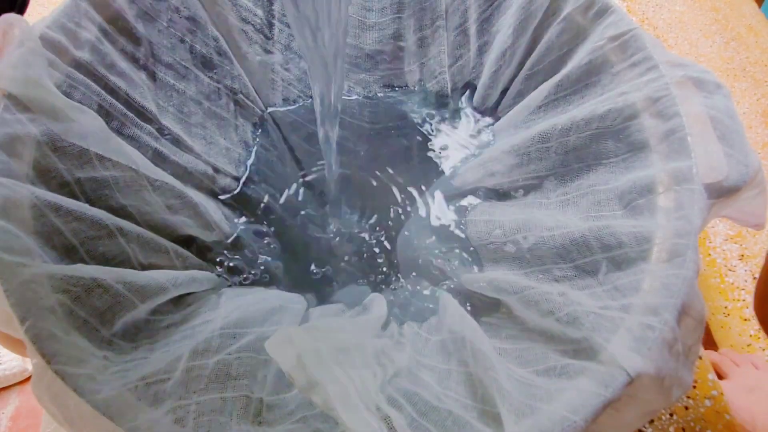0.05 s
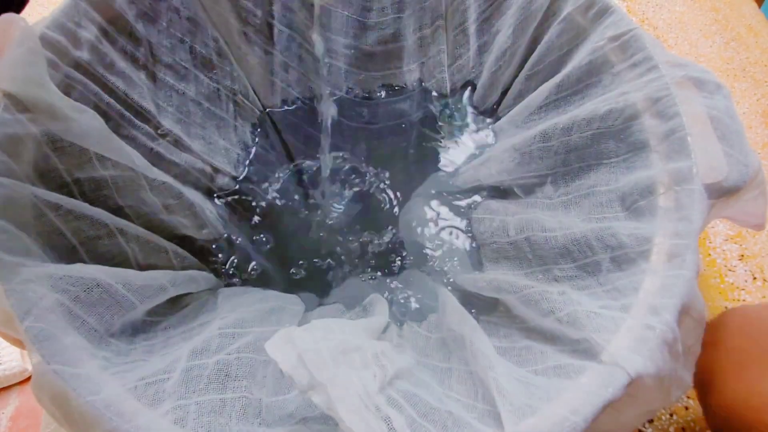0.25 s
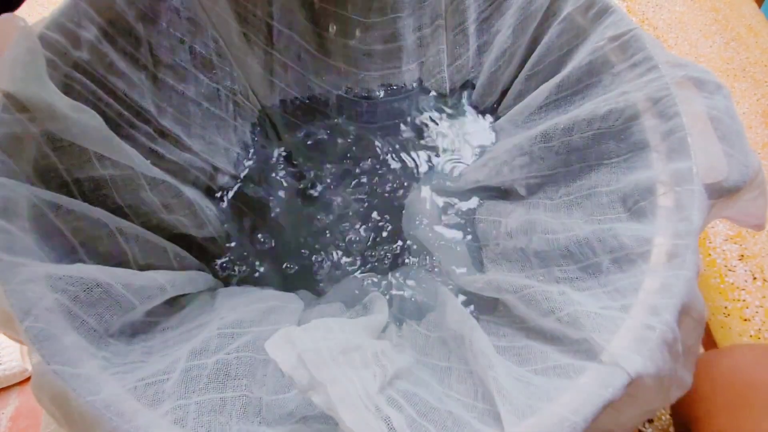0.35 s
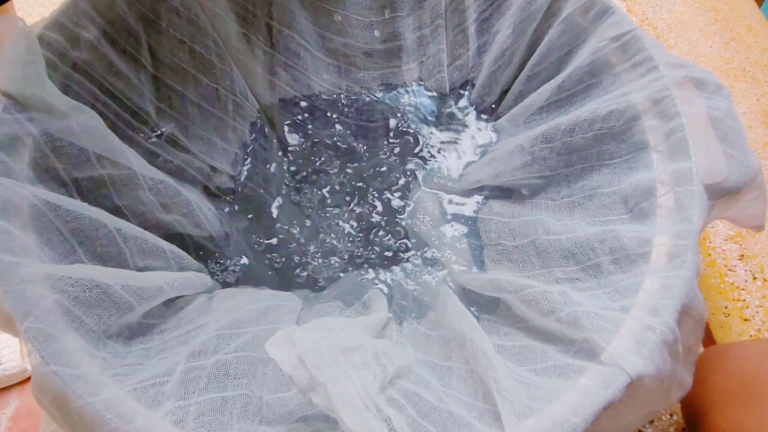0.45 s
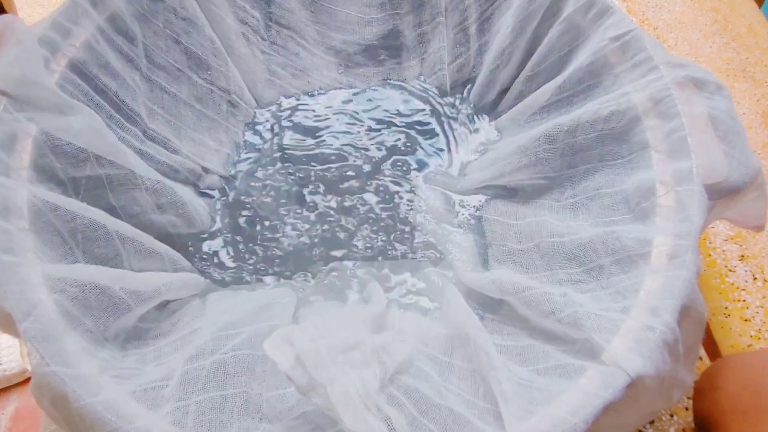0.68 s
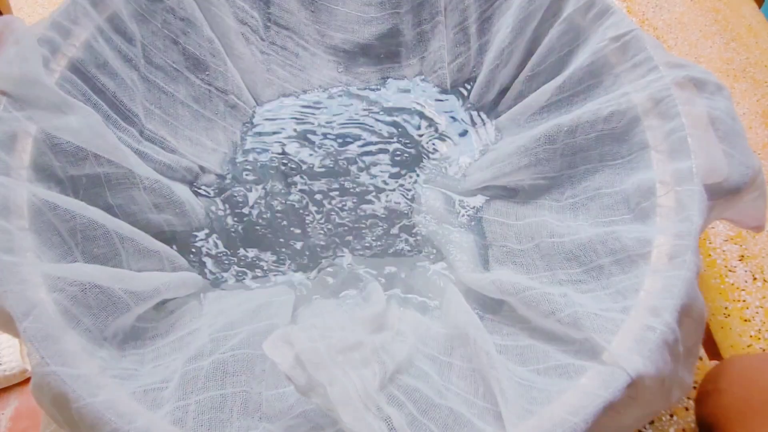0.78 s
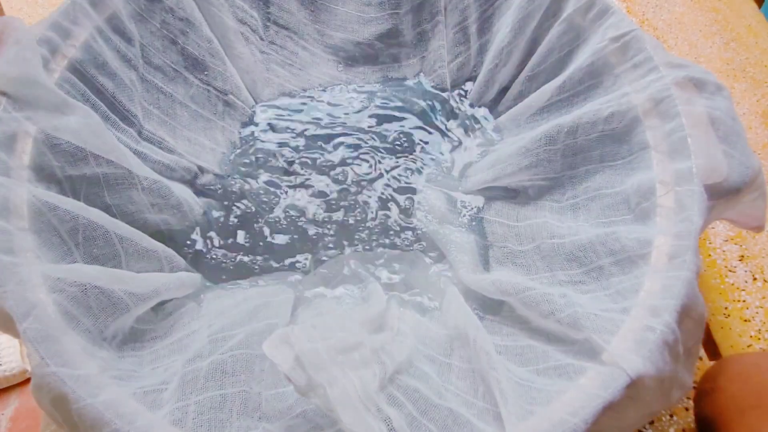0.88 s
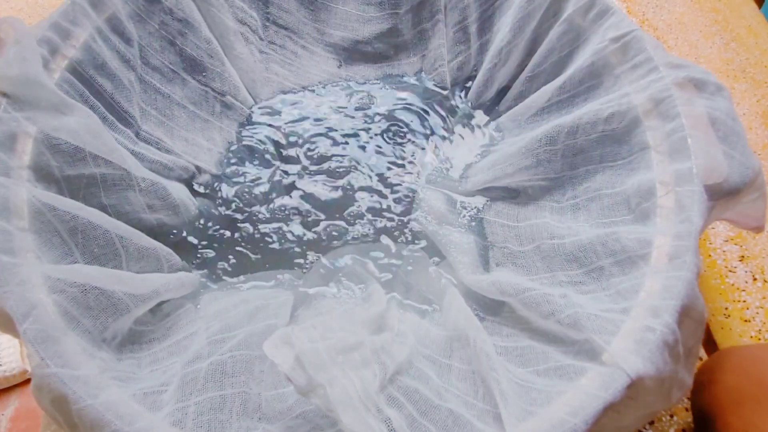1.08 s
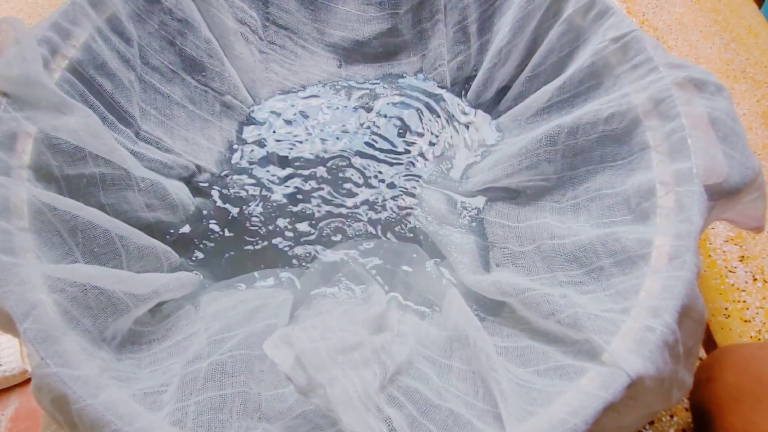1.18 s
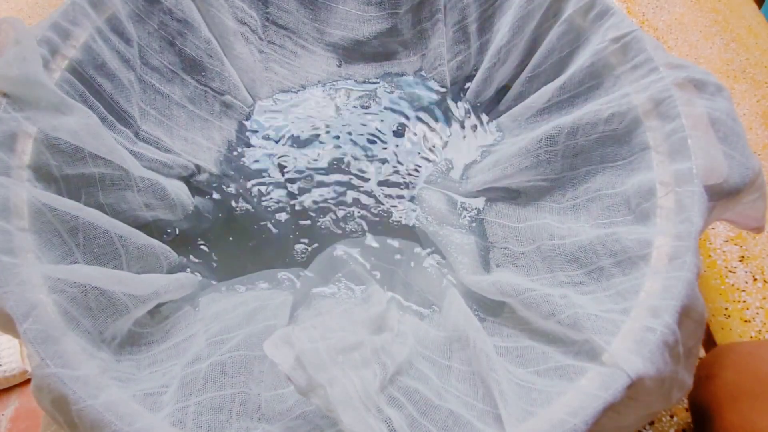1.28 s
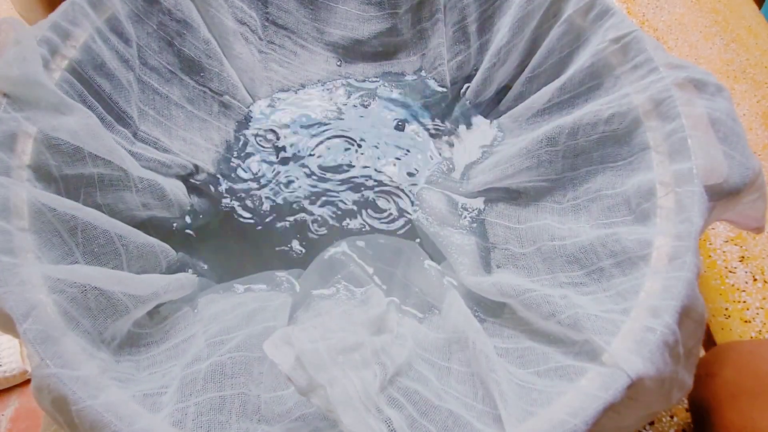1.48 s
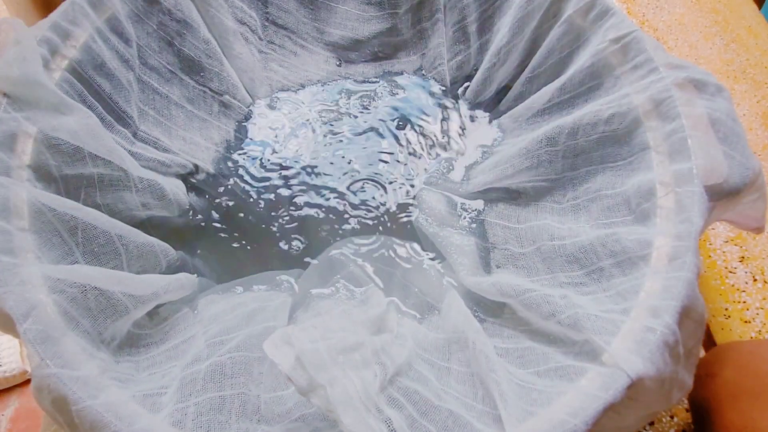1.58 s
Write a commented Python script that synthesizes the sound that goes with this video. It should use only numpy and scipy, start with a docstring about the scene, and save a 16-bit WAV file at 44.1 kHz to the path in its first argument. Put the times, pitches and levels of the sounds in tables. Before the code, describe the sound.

A thin stream of water splashes and bubbles into a cloth-lined tub, close by, its gurgle deepening. Around 0.4 seconds it runs out in a few deep bloops, with the last drops by 0.7. Froth fizzes faintly over a quiet background. Slightly to the right, a light knock comes at 1.1 seconds; a soft scuff follows, then sharp, loud plastic clicks at 1.3 and a weaker one at 1.4.

```python
"""A thin stream splashes into a pool in a cloth-lined tub, beating in bubbles and throwing spray.
It runs out; the last slugs open deep pockets of air that bloop and shake the tub.
Froth fizzes on the pool. Then come a knock and a few sharp clicks, probably from the emptied
plastic bucket, with a soft scuff between them, probably from a sandal."""
import sys
import numpy as np
from scipy import signal
from scipy.fft import rfft, irfft
from scipy.io import wavfile

SR = 44100
rng = np.random.default_rng(int(sys.argv[2]) if len(sys.argv) > 2 else 0)


def store_wav(level_fs):
    """Save 16-bit WAV to argv[1]."""
    pcm = np.round(np.clip(np.atleast_2d(level_fs), -1, 1) * 32767)
    wavfile.write(sys.argv[1], SR, pcm.T.astype(np.int16))


N = 72765
T = np.arange(N) / SR


def amp(db):
    """Decibels to gain."""
    return 10 ** (np.asarray(db) / 20)


def unit(x):
    """Scale to rms 1."""
    return x / np.sqrt(np.mean(x ** 2) + 1e-20)


def curve(points):
    """Breakpoints to one value per sample."""
    return np.interp(T, *np.transpose(points))


def at_hz(points, hz):
    """Interpolate on a log-frequency axis."""
    freq_hz, value = np.transpose(points)
    return np.interp(np.log(hz + 1), np.log(freq_hz + 1), value)


def add(mix, start_s, sound):
    """Mix a sound in at start_s."""
    part = mix[max(round(start_s * SR), 0):][:len(sound)]
    part += sound[:len(part)]


def colour(x, spectrum, tilt_db_per_oct=0, size=2048):
    """Minimum-phase filter, unit power gain; tilt acts above 2.5 kHz."""
    hz = abs(np.fft.fftfreq(size, 1 / SR))
    octaves = np.log2(np.maximum(hz, 2500) / 2500)
    log_gain = np.log(amp(at_hz(spectrum, hz) + tilt_db_per_oct * octaves))
    taps = np.fft.ifft(np.exp(np.conj(signal.hilbert(log_gain)))).real
    return signal.fftconvolve(x, taps / np.linalg.norm(taps))[:len(x)]


def resonate(x, hz, width_hz):
    """Resonance at a steady or moving pitch, rms 1."""
    carrier = np.exp(2j * np.pi * np.cumsum(hz * np.ones(N)) / SR)
    pole = np.exp(-np.pi * width_hz / SR)
    baseband = signal.lfilter([1], np.poly([pole, pole]), x / carrier)
    return unit((baseband * carrier).real)


def ticks(per_s, spread_db):
    """Random impulses of uneven size, rms 1."""
    impulses = (rng.random(N) < per_s / SR) * rng.choice([-1, 1], N)
    return unit(impulses * amp(spread_db * np.minimum(rng.exponential(1, N), 3.5)))


def impacts(rows, spectrum, snap, grain_db, size=4096):
    """Each impact: a snap, then a fast-dying crackle."""
    out, t = np.zeros(N), np.arange(size) / SR
    for start_s, level_db, decay_s, tilt_db_per_oct in rows:
        envelope = np.exp(-t / decay_s)
        crackle = rng.standard_normal(size) * amp(grain_db * np.minimum(rng.exponential(1, size), 4))
        hit = unit(crackle) * envelope
        hit[0] += snap
        hit = unit(colour(hit, spectrum, tilt_db_per_oct))
        add(out, start_s, amp(level_db) * hit * np.sqrt(np.mean(envelope ** 2)))
    return out


def bubble(hz, decay_s, attack_s, rise_per_s=1.6):
    """An air pocket rings, rising in pitch as it nears the surface."""
    t = np.arange(0, decay_s * 7, 1 / SR)
    envelope = (1 - np.exp(-(t / attack_s) ** 2)) * np.exp(-t / decay_s)
    return envelope / envelope.max() * np.sin(2 * np.pi * hz * (t + rise_per_s * t ** 2 / 2))


def bubble_cloud(low_hz, high_hz, decay_1khz_s, spread_db, count):
    """Many small bubbles; smaller ones die sooner. Rms 1."""
    out = np.zeros(N)
    for when, pitch, weakness, sustain in rng.random((count, 4)):
        hz = low_hz * (high_hz / low_hz) ** pitch
        decay_s = decay_1khz_s * (.5 + sustain) * np.sqrt(1000 / hz)
        gain = amp(-spread_db * weakness) * np.sqrt(hz)
        add(out, when * N / SR, gain * bubble(hz, decay_s, attack_s=decay_s / 6))
    return unit(out)


# Diffuse field, left to right: freq_hz, correlation
COHERENCE = [(50, 0.81), (150, 0.94), (300, 0.73), (650, 0.56), (1400, -0.52), (3000, 0.48), (16000, 0.03)]

def diffuse(pair):
    """Correlate two independent channels, most in the bass."""
    left, other = rfft(pair)
    hz = np.fft.rfftfreq(pair.shape[1], 1 / SR)
    correlation = np.clip(at_hz(COHERENCE, hz), -1, 1)
    right = correlation * left + np.sqrt(1 - correlation ** 2) * other
    return irfft([left, right], pair.shape[1])


# Room decay: freq_hz, t60_s
ROOM_DECAY = [(100, 0.4), (500, 0.4), (2500, 0.22), (8000, 0.16), (16000, 0.07)]

def place(x, lag_ms, pan_db, early_db, room_db, early_s=0.0027, size=24000):
    """Direct sound, early reflections, room tail. Positive lag and pan lean left."""
    t = np.arange(size) / SR
    hz, frame_s, noise = signal.stft(rng.standard_normal((2, size)), SR, nperseg=256)
    decay = amp(-60 * frame_s / at_hz(ROOM_DECAY, hz)[:, None])
    tail = signal.istft(noise * decay, SR, nperseg=256)[1][:, :size] * np.minimum(t / 0.0048, 1)
    early = rng.standard_normal((2, size)) * t * np.exp(-t / early_s * 2)
    response = diffuse(amp(room_db) * unit(tail) + amp(early_db) * unit(early)) / np.sqrt(size)
    khz = np.fft.rfftfreq(2 * N, 1000 / SR)
    delayed = irfft(rfft(x, 2 * N) * np.exp(-2j * np.pi * khz * lag_ms))[:N]
    direct = np.array([x * amp(pan_db / 2), delayed * amp(-pan_db / 2)])
    return direct + signal.fftconvolve(x[None], response, axes=1)[:, :N]


# Ambient noise: freq_hz, gain_db
AIR_SPECTRUM = [(20, -9.5), (60, -11), (130, -6), (200, -5), (300, -9), (450, -19.5), (550, -13),
                (800, -18.5), (2200, -30), (3500, -35), (5800, -24.5), (7200, -37.5), (16000, -19)]
# Ambient noise, rumble, whistle: time_s, level_db
AIR_LEVEL = [(0, -51.5), (.7, -59.5), (.82, -58), (.97, -56), (1.06, -56.5), (1.22, -55), (1.42, -54),
             (1.55, -62), (1.62, -61.5), (1.65, -64)]
RUMBLE_LEVEL = [(0, -61.5), (.2, -65), (.27, -96), (.42, -59), (.56, -49.5), (.66, -54), (.76, -82),
                (1.05, -82), (1.2, -56.5), (1.3, -75), (1.41, -53.5), (1.5, -83), (1.65, -83)]
WHISTLE_LEVEL = [(0, -88), (.7, -96), (.88, -70), (1.06, -71.5), (1.15, -98)]

def background():
    """Low ambient noise, a wavering rumble, a faint thin whistle."""
    air = np.array([colour(noise, AIR_SPECTRUM) for noise in rng.standard_normal((2, N))])
    rumble = np.array([resonate(noise, hz=70.5, width_hz=19) for noise in rng.standard_normal((2, N))])
    whistle = np.array([resonate(noise, hz=6130, width_hz=43) for noise in rng.standard_normal((2, N))])
    return (unit(diffuse(air)) * amp(curve(AIR_LEVEL))
            + diffuse(rumble) * amp(curve(RUMBLE_LEVEL))
            + whistle * amp(curve(WHISTLE_LEVEL)))


# Fizz: freq_hz, gain_db
FIZZ_SPECTRUM = [(500, -17), (3000, -7.5), (5000, -1), (6100, -0.5), (7000, 3), (10000, -2.5), (16000, -1)]
# Fizz: time_s, level_db
FIZZ_LEVEL = [(0, -71), (.5, -68), (.7, -61.5), (1.0, -68), (1.3, -58.5), (1.65, -78.5)]

def fizz():
    """Froth on the pool fizzes in fine, bright ticks."""
    return amp(curve(FIZZ_LEVEL)) * colour(ticks(per_s=470, spread_db=5.1), FIZZ_SPECTRUM)


# Sliding grit: freq_hz, gain_db
SCUFF_SPECTRUM = [(100, -48), (200, -0.5), (330, -22.5), (570, 0), (680, -7), (790, -2.5), (950, -8.5),
                  (1190, 2), (1550, -5), (2330, -12.5), (3400, -14.5), (4300, -21.5), (4950, -15.5),
                  (5900, -29), (15000, -32)]

def scuff(start_s=1.0765, peak_s=1.1955, rise_db_per_s=178, fall_db_per_s=143):
    """A soft gritty slide, probably a sandal, swells and fades after the knock."""
    level_db = -42.5 - np.maximum((peak_s - T) * rise_db_per_s, (T - peak_s) * fall_db_per_s)
    fade_in = np.clip((T - start_s) / 0.017, 0, 1)
    grit = np.array([colour(ticks(per_s=5000, spread_db=3.8), SCUFF_SPECTRUM) for _ in range(2)])
    return diffuse(grit) * amp(level_db) * fade_in


# Knock with rattle, clicks: start_s, level_db, decay_s, tilt_db_per_oct
KNOCK_HITS = [(1.0765, -43, 0.0032, 11), (1.0885, -51, 0.0027, -1), (1.0932, -30, 0.0034, 4.5),
              (1.0958, -23, 0.0014, -2.5), (1.098, -34.5, 0.0028, -8.5), (1.102, -33, 0.0015, 5)]
CLICK_HITS = [(1.327, -7.5, 0.0007, 1.5), (1.3292, -41, 0.00084, 15), (1.3345, -26.5, 0.0045, 1.5),
              (1.3462, -5, 0.0017, 12.5), (1.3487, -14.5, 0.0012, 1), (1.4225, -20.5, 0.0021, 11.5),
              (1.4243, -28.5, 0.00053, 8), (1.434, -40, 0.00084, 23)]
# Knock, clicks: freq_hz, gain_db
KNOCK_SPECTRUM = [(100, -32), (350, -18.5), (900, -13), (1600, -25), (2400, -7), (3100, -0.5), (3500, -2.5),
                  (4000, -4), (4550, 2), (6300, -4.5), (7300, -11), (8300, -7.5), (9600, -8), (11000, -15),
                  (12800, -12), (16000, -17.5)]
CLICK_SPECTRUM = [(100, -34), (800, -13.5), (1800, -12.5), (2400, -12), (2820, 5), (3150, -7), (3450, 2),
                  (3850, -12), (4400, -3.5), (5100, 2), (5600, -5.5), (6200, -9), (7000, -11.5),
                  (8600, 3.5), (10200, 1.5), (10900, 2.5), (12000, 2.5), (14000, -2), (15500, -1.5)]

def bucket(lag_ms=-0.328):
    """A dull knock, then sharp plastic clicks, from the right."""
    knock = impacts(KNOCK_HITS, KNOCK_SPECTRUM, snap=4.4, grain_db=2)
    knock = place(knock, lag_ms, pan_db=-2.1, early_db=-10, room_db=-10.5)
    clicks = impacts(CLICK_HITS, CLICK_SPECTRUM, snap=4.7, grain_db=2)
    return knock + place(clicks, lag_ms, pan_db=-2.4, early_db=-10, room_db=-9)


POOL_LAG_MS = 0.098
# Churned air: time_s, gain_db
CHURN_GAIN = [(0, -63.5), (.1, -62), (.16, -44), (.25, -54), (.31, -45), (.39, -44), (.43, -68),
              (.5, -77.5)]
# Moving resonance of the hollow: time_s, pitch_hz
CHURN_PITCH = [(0, 440), (.2, 385), (.28, 313), (.42, 287)]
# Steady resonances of the hollow: pitch_hz, width_hz, gain_db
HOLLOW_MODES = [(561, 120, -6), (838, 30, -12), (1358, 81, -8.5)]

def churn():
    """The hollow under the stream gurgles, deeper as the stream breaks up."""
    gurgle = resonate(ticks(per_s=300, spread_db=2.7), curve(CHURN_PITCH), width_hz=120)
    for pitch_hz, width_hz, gain_db in HOLLOW_MODES:
        gurgle += amp(gain_db) * resonate(ticks(per_s=900, spread_db=1), pitch_hz, width_hz)
    return place(gurgle * amp(curve(CHURN_GAIN)), POOL_LAG_MS, pan_db=-1, early_db=-11.5, room_db=-15)


# Tub modes: pitch_hz, gain_db, t60_s
TUB_MODES = [(64.5, -24, 0.5), (136.4, -20, 0.15), (183, -17, 0.22), (239.5, -27, .17), (272, -24, 0.13),
             (345.7, -18, 0.18), (571, -30, 0.13), (639, -19.5, 0.046)]
# Plunging slugs: start_s, pitch_hz, level_db, decay_s, tub_gain_db
SLUGS = [(.439, 260.6, -11.5, 0.0046, -13.5), (0.4494, 252, -21.5, 0.0029, -30),
         (0.4904, 264, -17, 0.003, -15.5), (0.527, 278, -27.5, 0.0038, -22), (0.596, 204, -50, 0.0093, -54),
         (.644, 231, -32.5, 0.0029, -36), (0.661, 227, -44, 0.003, -34.5)]

def bloops():
    """Each slug of water opens a deep air pocket and shakes the tub."""
    out, t = np.zeros(N), np.arange(SR // 2) / SR
    tub = sum(amp(db - 60 * t / t60_s) * np.sin(2 * np.pi * hz * t) for hz, db, t60_s in TUB_MODES)
    for start_s, pitch_hz, level_db, decay_s, tub_gain_db in SLUGS:
        add(out, start_s, amp(level_db) * bubble(pitch_hz, decay_s, attack_s=.0012))
        add(out, start_s, amp(tub_gain_db) * tub)
    out = signal.sosfilt(signal.butter(3, 55, "high", fs=SR, output="sos"), out)
    return place(out, lag_ms=0.14, pan_db=-3, early_db=-16, room_db=-17)


# Drops and slaps: freq_hz, gain_db
SPRAY_SPECTRUM = [(200, -10), (1500, -10), (3200, -1), (4300, -1), (5700, 5.5), (6700, -1), (8000, 3.5),
                  (9200, -5), (12500, -4), (16000, 2)]
# Slaps on the pool: start_s, level_db, decay_s, tilt_db_per_oct
SLAP_HITS = [(.0412, -19.5, 0.0036, 14.5), (.082, -43, 0.003, 22), (.097, -19, 0.00087, 7),
             (.103, -37.5, 0.015, -5.5), (.126, -28.5, 0.0048, 6.5), (.1695, -51, .0015, -9),
             (.1825, -28.5, 0.00075, -4.5), (.202, -31, 0.014, -1.5), (.248, -26, 0.0031, 4.5),
             (.281, -27.5, 0.0039, 4.5), (.304, -29, 0.002, -5.5), (.3168, -16, 0.0016, -0.5),
             (.366, -29.5, 0.0025, -3), (.372, -29.5, 0.00077, -8.5), (.400, -36, 0.0023, -2.5),
             (.436, -34.5, 0.0027, 3), (.486, -32, 0.003, 14), (.524, -42, 0.004, 5),
             (.6695, -23, 0.0016, 18)]

def spray(flow):
    """Drops and tiny bubbles follow the flow; the stream slaps the surface."""
    drops = colour(ticks(per_s=1100, spread_db=3.5), SPRAY_SPECTRUM)
    beads = bubble_cloud(low_hz=3500, high_hz=12500, decay_1khz_s=.0018, spread_db=18, count=1800)
    slaps = impacts(SLAP_HITS, SPRAY_SPECTRUM, snap=0.67, grain_db=5)
    return amp(-52) * flow * (drops + beads) + slaps


# Bubble cloud and rush: freq_hz, gain_db
BUBBLING_SPECTRUM = [(100, -32), (300, -1.5), (550, -6.5), (900, 0.5), (1150, -7), (1380, 0), (1900, -2.5),
                     (2400, -2), (3400, -4), (4300, -5.5), (8000, -10), (16000, -18)]
# Single bubbles: start_s, pitch_hz, level_db, decay_s
SINGLE_BUBBLES = [(0.026, 2590, -39, 0.0017), (0.048, 934, -35, 0.0025), (.105, 3430, -32.5, 0.0017),
                  (.126, 2324, -45, 0.0071), (.153, 460, -60, 0.0051), (0.167, 1050, -42.5, 0.005),
                  (0.208, 2254, -46, 0.021), (0.22, 5390, -28.5, 0.001), (0.247, 514, -35.5, 0.0048),
                  (0.267, 2545, -28.5, 0.0022), (0.291, 1467, -32.5, 0.0073), (0.309, 2996, -30.5, 0.0016),
                  (.309, 780, -39.5, 0.013), (.372, 1695, -28, 0.0024), (.373, 280, -34.5, 0.0036),
                  (.433, 1352, -23.5, 0.0045), (.441, 623, -19.5, 0.0049), (0.443, 2970, -27, 0.0013),
                  (.492, 576, -36.5, 0.0024), (.515, 2050, -48.5, 0.0046), (0.518, 1153, -51.5, 0.021),
                  (.6685, 5410, -37.5, 0.00093)]

def bubbling(flow):
    """Air beaten into the pool rings as a cloud of bubbles; a few stand out."""
    cloud = bubble_cloud(low_hz=446, high_hz=5003, decay_1khz_s=0.0041, spread_db=13, count=1000)
    rush = .5 * rng.standard_normal(N)
    out = amp(-44.5) * flow * unit(colour(cloud + rush, BUBBLING_SPECTRUM))
    for start_s, pitch_hz, level_db, decay_s in SINGLE_BUBBLES:
        add(out, start_s, amp(level_db) * bubble(pitch_hz, decay_s, attack_s=0.0016))
    return out


# Stream strength: time_s, gain_db
FLOW_GAIN = [(0, 1), (.03, -3), (.07, -5), (.11, -4.5), (.2, -2), (.26, -6), (.315, 4.5), (.37, -27),
             (.42, -5.5), (.52, -12), (.6, -30.5), (.75, -41.5)]

def stream():
    """The stream drives bubbles and spray, then runs out; the froth fizzes on."""
    flow = amp(curve(FLOW_GAIN))
    body = bubbling(flow)
    surface = spray(flow) + fizz()
    return (place(body, lag_ms=0.12, pan_db=3.1, early_db=-5, room_db=-13)
            + place(surface, POOL_LAG_MS, pan_db=.3, early_db=-10, room_db=-10.5))


def scene():
    """Stereo sum of all sources."""
    return stream() + churn() + bloops() + bucket() + scuff() + background()


def record(dry):
    """Low-pass at 15.95 kHz."""
    taps = signal.firwin(255, 15950, window=("kaiser", 8), fs=SR)
    return signal.oaconvolve(dry, taps[None], "same")


dry = scene()
out = record(dry)
store_wav(out)
```